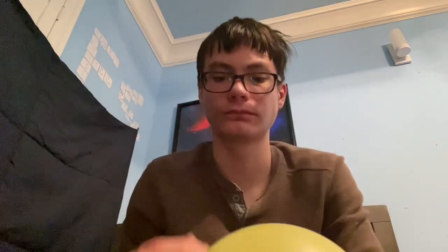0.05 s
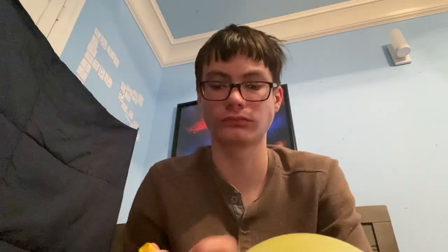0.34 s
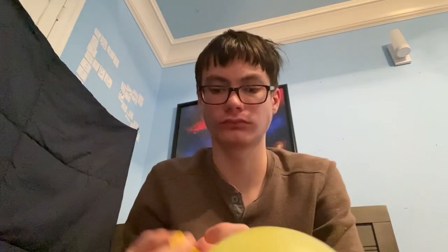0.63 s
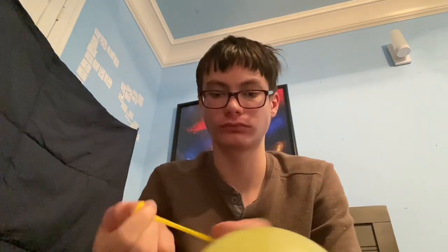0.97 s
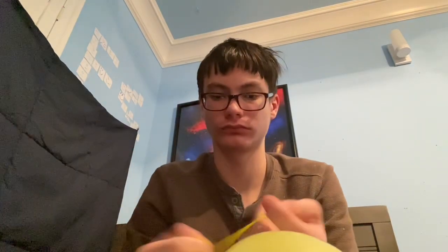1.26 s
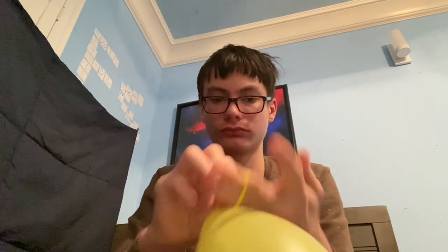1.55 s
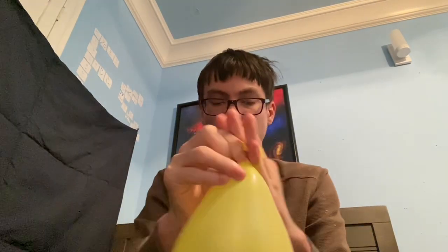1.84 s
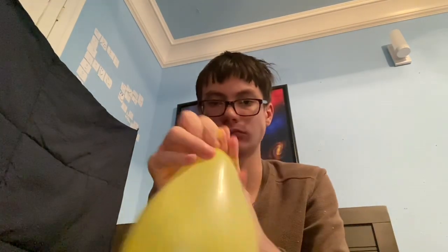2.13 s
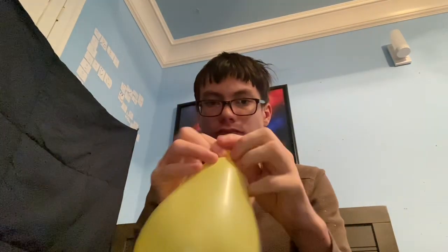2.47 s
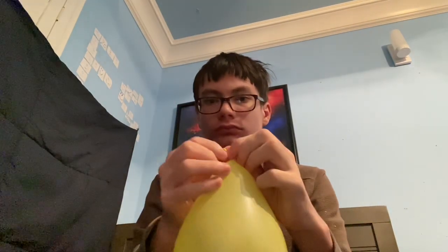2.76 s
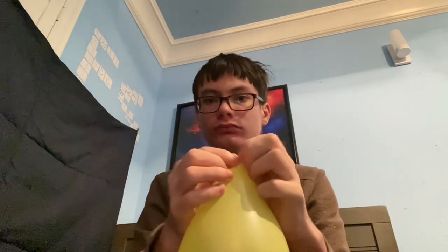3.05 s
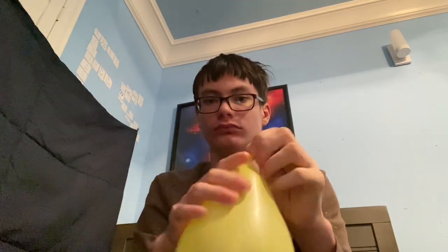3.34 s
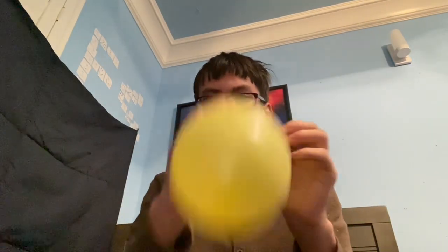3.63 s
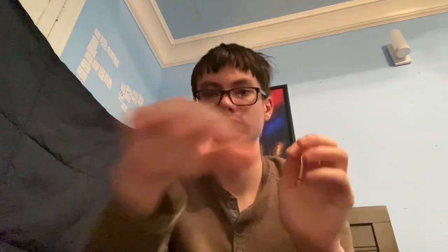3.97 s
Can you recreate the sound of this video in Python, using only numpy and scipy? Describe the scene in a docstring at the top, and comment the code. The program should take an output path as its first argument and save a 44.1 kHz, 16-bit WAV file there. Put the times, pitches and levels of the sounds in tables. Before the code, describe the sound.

Rubbery snaps and creaks come from a balloon being knotted indoors. Light rubbing and ticking build to sharper snaps with a brief hollow ring, then a short squeak as the knot pulls tight, and some final snaps.

```python
"""An inflated rubber balloon is handled and knotted in a small room.
From the start, fingers hiss over the skin and stick-slip friction releases it in snaps and creaks;
each slip crosses the skin as a chirp and sets the enclosed air ringing. Near 0.9 s the stretched neck
ticks through the fingers. Louder snaps and short hoots follow around 2 s, the loudest at 3.1 s.
At 3.25 s the knot slides tight with a squeak, and a few last snaps die away."""
import sys
import numpy as np
from scipy import signal
from scipy.fft import rfft, irfft
from scipy.io import wavfile

SR = 44100
rng = np.random.default_rng(int(sys.argv[2]) if len(sys.argv) > 2 else 0)


def transcribe(signal):
    """Save signal, clipped to [-1, 1], as a 16-bit WAV file at the path in sys.argv[1]."""
    frames = np.atleast_2d(signal).T
    limited = np.clip(frames, -1, 1)
    pcm = np.round(limited * 32767).astype(np.int16)
    wavfile.write(sys.argv[1], SR, pcm)


N = 176400
T = np.arange(N) / SR
SHORT = T[:2048]  # time axis of one slip

# spectrum of the crack at a finger: f/Hz, gain/dB
CRACK_SPECTRUM = [(500, -8), (1500, -9), (2600, 3), (3400, 3.5), (4600, 3), (6200, 2), (9000, -5.5),
                  (16000, -13)]


def slip(hz, skin_db, thump_db, crack_db, travel_ms):
    """Impulse excitation: one release gives a crack, a chirp across the skin and a whole-body thump."""
    scatter_s, crack_s, radiation_limit_hz = 0.0061, 0.0024, 2850
    kick = 1. * (SHORT == 0)
    scatter, burst = rng.standard_normal((2, len(SHORT)))
    wave = kick + amp(-21.5) * scatter * np.exp(-SHORT / scatter_s)
    wave = edge(wave, 0.38 * hz, "high", order=5)
    wave = edge(wave, 1.31 * hz, "low", order=2)
    wave = edge(wave, radiation_limit_hz, "low", order=12)
    skin = peak_one(cross_skin(wave, travel_ms))
    thump = peak_one(cross_skin(band(kick, 70, 178), travel_ms))
    crack = peak_one(colour(burst * np.exp(-SHORT / crack_s), CRACK_SPECTRUM))
    return amp(skin_db) * skin + amp(thump_db) * thump + amp(crack_db) * crack


def cross_skin(x, travel_ms):
    """Dispersion: on the air-loaded skin low notes arrive later; travel_ms is the delay at 1 kHz."""
    dispersion = .7  # group delay falls as f ** -dispersion
    khz = np.arange(len(x) + 1) * SR / (2 * len(x)) / 1000
    power = 1 - dispersion
    phase = 2 * np.pi * travel_ms * khz ** power / power
    return irfft(rfft(x, 2 * len(x)) * np.exp(-1j * phase))[:len(x)]


def snaps():
    """Static friction gives way: the strained rubber is released in single slips."""
    # slips and taps: t/s, skin f/Hz, skin level/dB, thump level/dB, crack level/dB, delay at 1 kHz/ms
    releases = [(.042, 800, -24.5, -57, -52, 1.2), (.058, 990, -20, -51, -34, 1.2),
                (0.157, 447, -37, -50, -55, 1.95), (0.257, 2170, -29.5, -66, -24.5, 0.87),
                (0.288, 1240, -21.5, -48.5, -23.5, 0.51), (0.4, 1260, -33.5, -56, -34.5, 0.48),
                (.569, 1510, -26, -34.5, -24.5, 2), (0.727, 500, -39.5, -49, -57, 1.85),
                (0.807, 1890, -32.5, -44.5, -35.5, 0.45), (.936, 2250, -30, -53, -32.5, 0.31),
                (1.037, 1790, -62, -40.5, -31, 0.54), (1.202, 1280, -30.5, -63, -32, 1),
                (1.403, 940, -29, -45, -31, 1), (1.414, 900, -26.5, -58, -26, 1),
                (1.51, 1180, -24, -29, -27.5, 1.2), (1.722, 467, -35.5, -61, -52, 2.33),
                (1.813, 486, -31.5, -57, -39.5, 2.96), (1.830, 530, -29.5, -49, -36, 1.5),
                (1.836, 1300, -26, -52, -33, 0.42), (1.884, 1010, -18, -40, -18.5, 0.91),
                (2.0724, 1520, -13, -39, -24, 0.48), (2.0792, 1480, -15.5, -48, -28.5, 0.45),
                (2.091, 1300, -12, -43, -21.5, 0.48), (2.1851, 1170, -15, -43.5, -18.5, 1),
                (2.201, 620, -18.5, -43, -25.5, 0.83), (2.279, 1680, -24.5, -66, -9, 0.92),
                (2.287, 1470, -32, -40, -20.5, 1.06), (2.432, 1500, -71, -47, -32, 0.9),
                (2.471, 357, -31.5, -33, -37, 1.87), (3.108, 900, -11, -36, -7.5, 1.3),
                (3.1163, 940, -6, -40.5, -17, 0.58), (3.161, 955, -24.5, -58, -27, 1.13),
                (3.431, 1370, -22, -35.5, -22, 1), (3.4354, 523, -12, -23.5, -26, 1.493),
                (3.447, 690, -15.5, -28, -27, 0.977), (3.6955, 520, -31.5, -43, -28.5, 1.77),
                (3.805, 780, -41, -43, -42.5, 3.2), (3.849, 700, -42.5, -47.5, -43, 1)]
    out = np.zeros(N)
    for start, *shape in releases:
        add(out, start, slip(*shape))
    return out


def creaks():
    """Relaxation oscillation: a dragging finger sticks and slips in uneven runs that swell and fade."""
    # runs: t/s, duration/s, slip rate/Hz, skin f/Hz, skin level/dB, thump level/dB, crack level/dB
    runs = [(0.033, 0.029, 386, 1080, -28.5, -51, -32), (0.235, 0.027, 470, 2340, -42, -59, -32),
            (1.205, 0.02, 297, 1220, -36, -46.5, -35), (1.297, 0.067, 76, 624, -36.5, -50, -35),
            (1.422, 0.11, 89, 560, -33.5, -62, -33), (1.888, 0.049, 226, 1260, -24, -40.5, -26.5),
            (2.188, 0.0094, 500, 1250, -20, -44, -26), (2.263, 0.0055, 540, 2220, -36, -67, -25),
            (2.503, 0.046, 770, 1300, -36.5, -76, -41.5), (2.577, 0.013, 190, 910, -36.5, -69, -66),
            (2.719, 0.11, 175, 660, -44, -85, -60), (2.858, 0.039, 205, 1290, -36, -66, -45),
            (3.346, 0.014, 380, 1380, -31, -52, -23.5), (3.452, 0.0206, 260, 760, -20.5, -38, -27.5)]
    jitter, spread_db = .11, 3
    out = np.zeros(N)
    for start, length, rate, *shape in runs:
        gaps, sizes = rng.standard_normal(size=(2, 64))
        slips = [slip(*shape, travel_ms=0.886) for _ in range(3)]
        picks = rng.integers(len(slips), size=len(gaps))
        times = np.r_[0, np.cumsum(np.exp(jitter * gaps[1:]))] / rate
        for k, t in enumerate(times[times < length]):
            swell = np.sin(np.pi * (t * rate + 1) / (length * rate + 2)) ** .5
            add(out, start + t, swell * amp(spread_db * sizes[k]) * slips[picks[k]])
    return out


def knot_squeak():
    """Stick-slip at audio rate: the tightening knot whistles, then rasps; uneven slips scrape more."""
    # slide of the knot: t/s, slip rate/Hz, level/dB, roughness (0-1)
    slide = [(3.238, 3300, -47.5, 0.08), (3.249, 2850, -27, 0.045), (3.2565, 2480, -17.5, 0.02),
             (3.262, 3000, -19, 0.04), (3.270, 3200, -20, .15), (3.277, 850, -25, 0.23),
             (3.281, 700, -35.5, 0.03), (3.2865, 1170, -23.5, 0.3), (3.295, 880, -21.5, .04),
             (3.304, 1000, -21.5, .03), (3.32, 960, -27.5, 0.1), (3.338, 1100, -54, 0.2)]
    # spectrum of the squeak: f/Hz, gain/dB
    spectrum = [(200, -36.5), (600, -11.5), (1000, 2), (1600, -3.5), (2550, 0), (3600, -6.5), (5100, -1),
                (8000, -3.5), (11000, -7.5), (16000, -11)]
    rate, db, rough = in_time(slide)
    cycles = np.cumsum(rate * np.exp(rough * wander(1500))) / SR
    # one pulse a cycle, shared between the two nearest samples
    position = np.interp(np.arange(1, int(cycles[-1])), cycles, np.arange(N))
    i = np.minimum(position.astype(int), N - 2)
    size = (1 + np.tanh(0.93 * rough * rng.standard_normal(N)))[i] / np.sqrt(rate[i])
    pulses = np.zeros(N)
    pulses[i], pulses[i + 1] = size * (1 - position + i), size * (position - i)
    scrape = amp(9) * rough * rms_one(rng.standard_normal(N) * (1 - cycles % 1) ** 2)
    sliding = (T > slide[0][0]) * (T < slide[-1][0])
    squeak = rms_one(colour(rms_one(pulses) + scrape, spectrum))
    return cross_skin(squeak * amp(db) * sliding, travel_ms=1.5)


def hoots():
    """Membrane vibration: the rubber sounds short gliding tones with a weak second harmonic; the faint steady
    tone near 1 kHz at 3.735 s is the enclosed air ringing on after the glide before it."""
    # tones: t/s, duration/s, first f/Hz, last f/Hz, peak level/dB
    tones = [(0.061, 0.026, 403, 360, -32), (0.246, 0.0204, 5000, 5420, -35),
             (1.313, 0.26, 317, 280, -38.5), (1.412, 0.053, 104, 119, -30.5),
             (1.892, 0.051, 288, 498, -28.5), (1.89, 0.059, 1310, 1230, -29), (2.498, 0.066, 886, 990, -32),
             (2.084, 0.016, 348, 285, -22), (2.76, 0.053, 402.5, 394, -33.5), (3.111, 0.018, 489, 563, -12),
             (3.1165, 0.009, 760, 980, -7), (3.263, 0.028, 1226, 1060, -27.5),
             (3.305, 0.054, 1024, 930, -30.5), (3.702, 0.019, 856, 1010, -27.5),
             (3.735, 0.044, 1005, 990, -46.5)]
    wobble = 1 + 0.042 * wander(200)
    out = np.zeros(N)
    for start, length, first_hz, last_hz, db in tones:
        progress = np.linspace(0, 1, int(length * SR))
        hz = (first_hz + (last_hz - first_hz) * progress) * wobble[int(start * SR):][:len(progress)]
        phase = 2 * np.pi * np.cumsum(hz) / SR
        tone = np.sin(phase) + amp(-22) * np.sin(2 * phase)
        add(out, start, amp(db) * np.sin(np.pi * progress) * tone)
    return out


def neck_ticks():
    """Damped oscillation: the stretched neck cracks and rings briefly at each slip through the fingers."""
    # slips of the neck: t/s, level/dB
    ticks = [(0.8372, -41), (.876, -34), (0.8869, -33), (.894, -31.5), (.902, -33), (.911, -38),
             (0.9227, -42), (0.9586, -35), (.9625, -38), (.967, -35)]
    ring_hz, ring_s, crack_s = 1300, 0.0014, 0.00067
    ring = np.sin(2 * np.pi * ring_hz * SHORT) * np.exp(-SHORT / ring_s)
    out = np.zeros(N)
    for start, db in ticks:
        burst = rng.standard_normal(len(SHORT)) * np.exp(-SHORT / crack_s)
        crack = peak_one(colour(burst, CRACK_SPECTRUM))
        add(out, start, amp(db) * (ring + amp(1) * crack))
    return out


def trapped_air(skin):
    """Cavity resonance: the air inside rings on in its normal modes after the skin has moved."""
    # air modes: f/Hz, gain/dB, T60/s
    modes = [(342, -10.5, 0.08), (403.3, -3.5, 0.3), (474, -2, 0.051), (680, -4, 0.38), (760, -2.5, 0.42),
             (900, -1.5, 0.28), (1005, -4.5, 0.4), (1175, -2.5, 0.17), (1294, 1.5, 0.15), (2320, -6.5, 0.1)]
    out = np.zeros(N)
    for hz, db, t60 in modes:
        radius = np.exp(-np.log(1000) / (t60 * SR))
        forward = np.array([1, 0, -1]) * (1 - radius ** 2) / 2
        feedback = [1, -2 * radius * np.cos(2 * np.pi * hz / SR), radius ** 2]
        out += amp(db) * signal.lfilter(forward, feedback, skin + 1e-18)
    return out


def rubbing(curve, spectrum, gain_db, grain_db=2):
    """Friction noise: random amplitude modulation makes it grainy under a level curve."""
    grains = rng.standard_normal(N) * amp(grain_db * wander(440))
    return amp(in_time(curve)[0] + gain_db) * rms_one(colour(grains, spectrum))


def finger_hiss():
    """Sliding friction: fingers hiss on the rubber, brighter in some strokes than in others."""
    # strokes: t/s, relative level/dB, extra gain above 8 kHz/dB
    strokes = [(0, -48, -1), (.06, -47, 4), (.11, -51.5, 5), (.19, -46, 1.5), (.24, -42, -1), (.3, -54, -2),
               (.34, -61, -5), (.45, -63.5, 2), (.52, -45, -1.5), (.58, -44, 2), (.66, -47, 1),
               (.75, -47.5, -2), (.82, -58, -1), (.9, -63, -10), (1, -58, 4), (1.08, -59, -7),
               (1.12, -46.5, 2), (1.21, -44, 3.5), (1.28, -47.5, -4), (1.43, -45, 7.5), (1.54, -43, 6),
               (1.63, -48.5, 1), (1.75, -51, 7), (1.8, -59.5, -2), (1.87, -54, 9), (1.93, -40.5, -2),
               (2.03, -46.5, 10), (2.13, -42.5, -0.5), (2.24, -47.5, 5), (2.3, -37.5, 4.5), (2.36, -54, 3),
               (2.46, -51, 4.5), (2.53, -56, -10), (2.6, -56, 2), (2.72, -54.5, 1), (2.84, -67, 3),
               (2.93, -68, -1), (3, -64, -5), (3.04, -52, 1), (3.16, -43.5, 4), (3.22, -46.5, 4),
               (3.4, -57.5, 9), (3.5, -59.5, 5), (3.6, -67.5, -13), (3.695, -64.5, -6), (3.706, -41, -5),
               (3.75, -59.5, 12), (3.78, -67, -6), (3.86, -62, -1), (3.93, -79, 0)]
    # spectrum of the hiss: f/Hz, gain/dB
    spectrum = [(700, -11), (1800, 5.5), (3000, 3), (5000, 5.5), (7800, 3.5), (9500, -5), (13000, -6.5),
                (16000, -6)]
    hiss = rubbing(strokes, spectrum, gain_db=-3)
    top = irfft(rfft(hiss) * (np.arange(N // 2 + 1) * SR / N > 8000), N)
    _, top_db = in_time(strokes)
    return hiss + top * (amp(top_db) - 1)


def skin_rustle():
    """Frictional excitation: the skin rustles in the midrange under the hands."""
    # envelope of the rustle: t/s, relative level/dB
    envelope = [(0, -46), (.15, -54.5), (.25, -45.5), (.37, -65), (.46, -55.5), (.55, -51.5), (.65, -57.5),
                (.8, -50), (.99, -55.5), (1.06, -54.5), (1.18, -57), (1.33, -48.5), (1.45, -47.5),
                (1.6, -53.5), (1.7, -58.5), (1.76, -48), (1.8, -54), (1.96, -43), (2.05, -53),
                (2.15, -42.5), (2.3, -52), (2.39, -62), (2.44, -55), (2.68, -49.5), (2.8, -51),
                (2.95, -57.5), (3.06, -55), (3.15, -37.5), (3.22, -64.5), (3.3, -32.5), (3.38, -45.5),
                (3.55, -59), (3.68, -60), (3.73, -49), (3.8, -75), (3.87, -67.5), (4, -84)]
    # spectrum of the rustle: f/Hz, gain/dB
    spectrum = [(120, -19), (300, -2.5), (500, -2), (950, -0.5), (1400, -4.5), (2400, -16.5), (5000, -34)]
    return rubbing(envelope, spectrum, gain_db=-2)


def handling_rumble():
    """Forced vibration: handling shakes the balloon at low frequencies."""
    # envelope of the rumble: t/s, relative level/dB
    envelope = [(0, -37), (.12, -61), (.28, -53), (.48, -66), (.55, -43.5), (.66, -57.5), (.76, -51.5),
                (.97, -71), (1.04, -49), (1.18, -58), (1.31, -38.5), (1.39, -47), (1.44, -32.5),
                (1.55, -51.5), (1.69, -56), (1.77, -46), (1.86, -46), (2, -54), (2.4, -61.5), (2.5, -62),
                (2.62, -76), (3.07, -77.5), (3.12, -47), (3.2, -60.5), (3.305, -34), (3.38, -77),
                (3.5, -65), (3.68, -57.5), (3.75, -51), (3.86, -55), (4, -73)]
    # spectrum of the rumble: f/Hz, gain/dB
    spectrum = [(20, -49), (40, -21.5), (65, -0.5), (110, -3), (200, -3), (320, 0), (600, -32)]
    return rubbing(envelope, spectrum, gain_db=-4.5, grain_db=2.5)


def room(x):
    """Reverberation: a diffuse tail builds quickly and dies soonest in the high treble."""
    # reverberation time: f/Hz, T60/s
    decay = [(100, 0.19), (500, 0.29), (2000, .4), (6000, 0.21), (16000, 0.083)]
    # spectrum of the tail: f/Hz, gain/dB
    spectrum = [(60, -12), (250, -8), (600, -15), (1200, -16.5), (3000, -10.5), (7000, -13), (16000, -23.5)]
    t, tail = T[:SR // 2], 0
    build_up = 1 - np.exp(-(t / 0.0081) ** 2)
    octaves = 40 * 2. ** np.arange(10)
    for low, high in zip(octaves, octaves[1:]):
        fade = build_up * np.exp(-np.log(1000) * t / at_hz(decay, np.sqrt(low * high)))
        tail = tail + band(rng.standard_normal(len(t)), low, high) * fade / np.linalg.norm(fade)
    return signal.fftconvolve(x, colour(tail, spectrum))[:N]


def background():
    """Stationary noise: a faint, dull floor."""
    # spectrum of the floor: f/Hz, gain/dB
    spectrum = [(20, -37.5), (45, -29), (90, -1), (300, -5), (800, -12.5), (2500, -18.5), (16000, -31.5)]
    return amp(-70.5) * rms_one(colour(rng.standard_normal(N), spectrum))


def amp(db):
    """Decibels to amplitude ratio."""
    return 10 ** (np.asarray(db) / 20)


def rms_one(x):
    """Normalisation to rms 1."""
    return x / np.sqrt(np.mean(x ** 2) + 1e-20)


def peak_one(x):
    """Normalisation to peak 1."""
    return x / (np.abs(x).max() + 1e-20)


def in_time(rows):
    """Linear interpolation of a curve's columns at every sample."""
    times, *columns = np.transpose(rows)
    return [np.interp(T, times, column) for column in columns]


def at_hz(points, hz):
    """Interpolation on a log-frequency axis."""
    freqs, values = np.transpose(points)
    return np.interp(np.log(np.maximum(hz, 1)), np.log(freqs), values)


def colour(x, points):
    """Minimum-phase filter: folding the cepstrum gives a causal response with the given spectrum."""
    n = 2 * len(x)
    cepstrum = irfft(np.log(amp(at_hz(points, np.arange(n // 2 + 1) * SR / n))))
    cepstrum[1:n // 2] *= 2
    cepstrum[n // 2 + 1:] = 0
    return irfft(rfft(x, n) * np.exp(rfft(cepstrum)))[:len(x)]


def edge(x, hz, kind, order):
    """Maximally flat filter with cutoff at hz."""
    return signal.sosfilt(signal.butter(order, hz, kind, fs=SR, output="sos"), x + 1e-18)


def band(x, low, high):
    """Gentle band-pass."""
    return edge(x, [low, high], "band", order=2)


def wander(per_s):
    """Random fluctuation of rms 1, interpolated between per_s values a second."""
    return rms_one(np.interp(T * per_s, np.arange(N), rng.standard_normal(N)))


def add(out, start, x):
    """Superposition of x from start seconds on."""
    i = int(start * SR)
    out[i:i + len(x)] += x[:N - i]


def scene():
    """Source and resonator: the skin drives the enclosed air, and the whole balloon excites the room."""
    skin = snaps() + creaks() + neck_ticks() + knot_squeak() + skin_rustle()
    balloon = skin + trapped_air(skin) + hoots() + finger_hiss() + handling_rumble()
    return (balloon + background() + room(balloon))[None]


def record(dry):
    """Band limiting: a steep elliptic low-pass cuts the highest treble."""
    cutoff_hz = 15850
    return signal.sosfilt(signal.ellip(12, .2, 80, cutoff_hz, fs=SR, output="sos"), dry)


dry = scene()
out = record(dry)
transcribe(out)
```